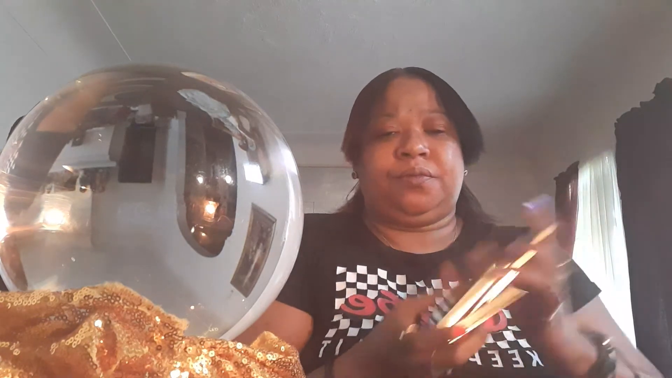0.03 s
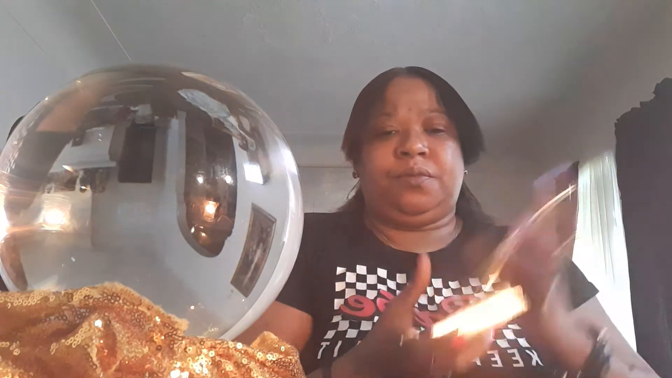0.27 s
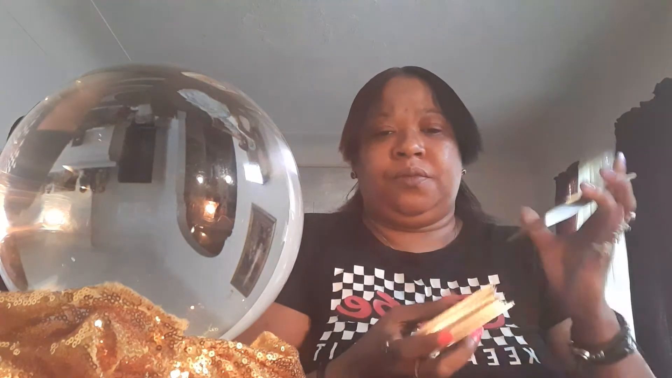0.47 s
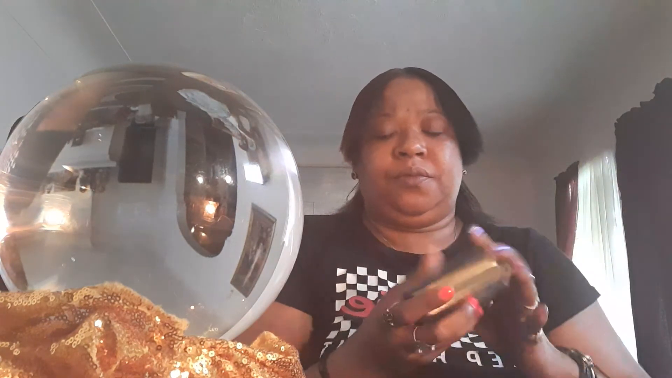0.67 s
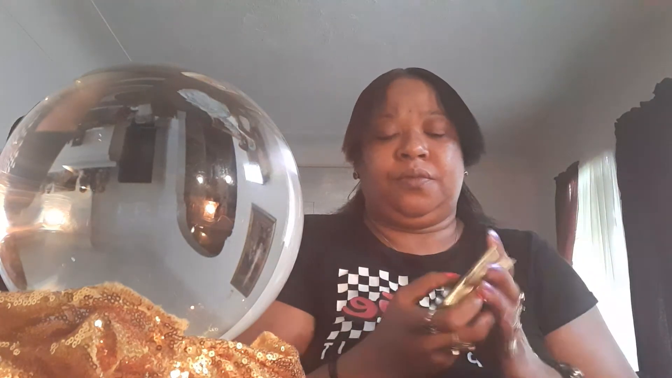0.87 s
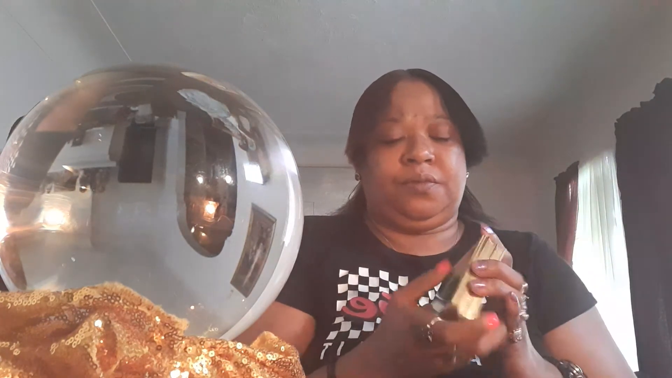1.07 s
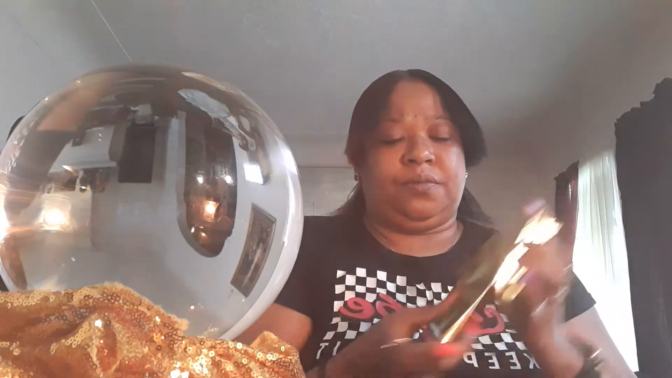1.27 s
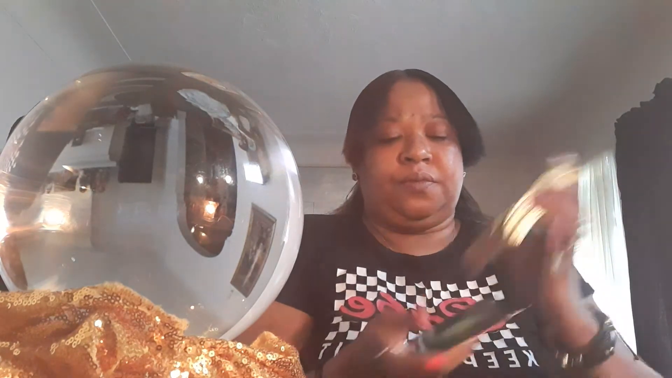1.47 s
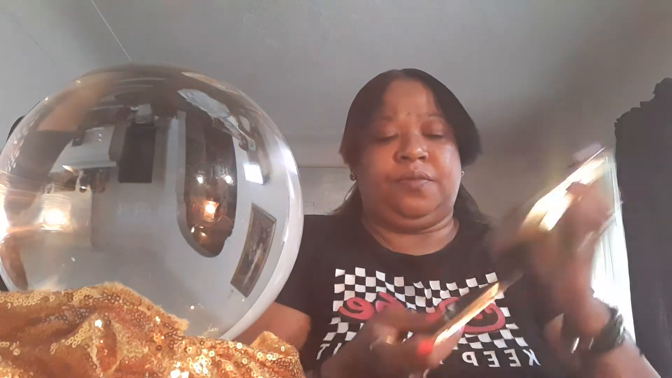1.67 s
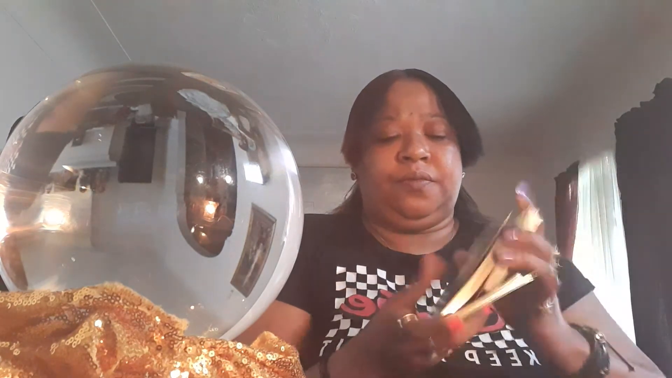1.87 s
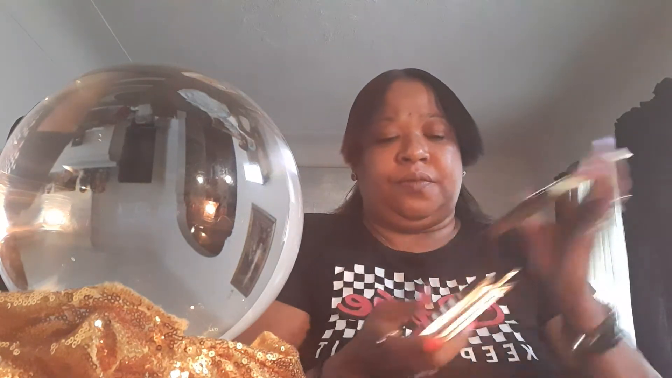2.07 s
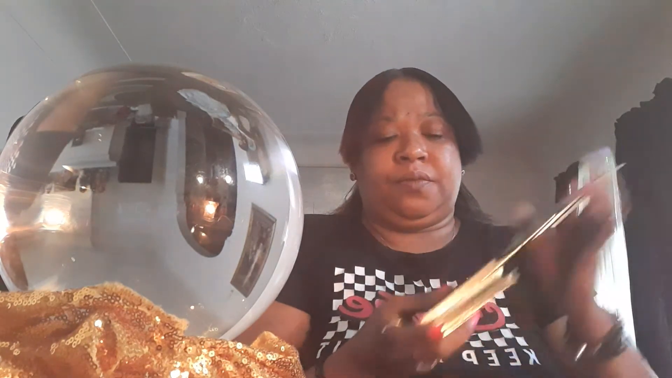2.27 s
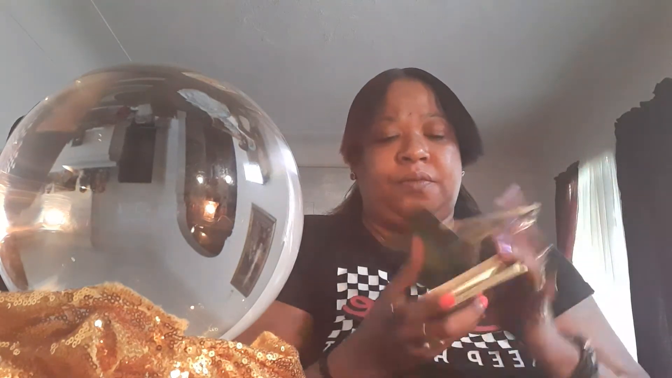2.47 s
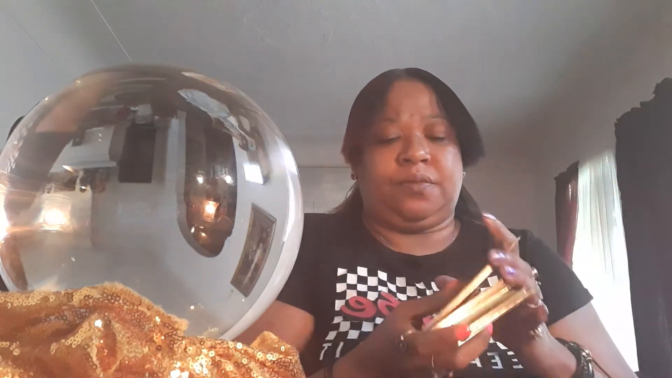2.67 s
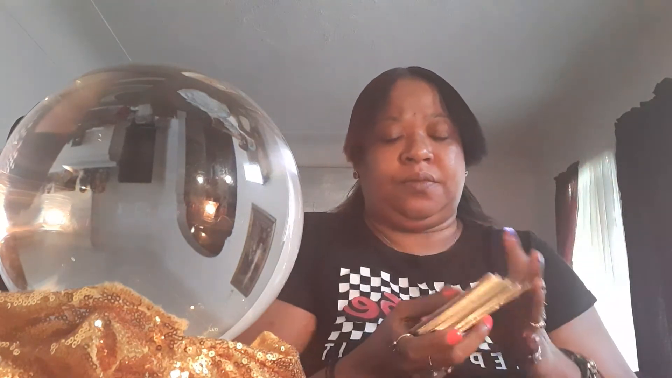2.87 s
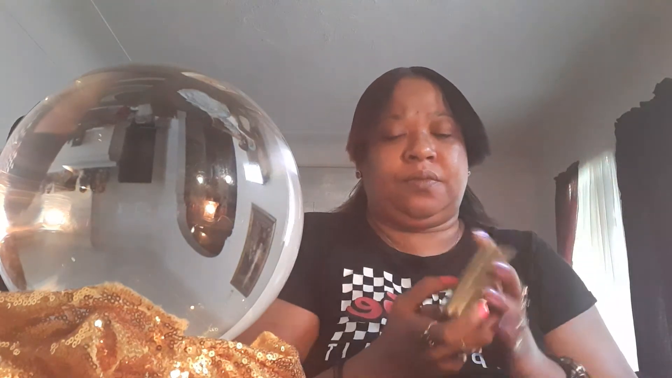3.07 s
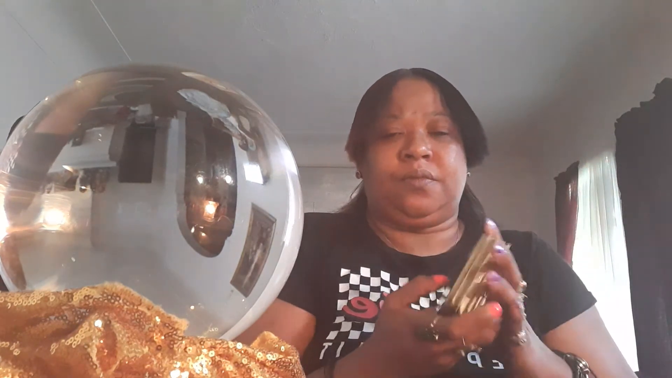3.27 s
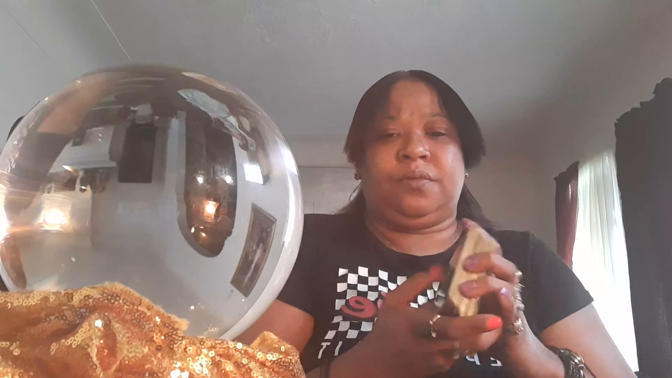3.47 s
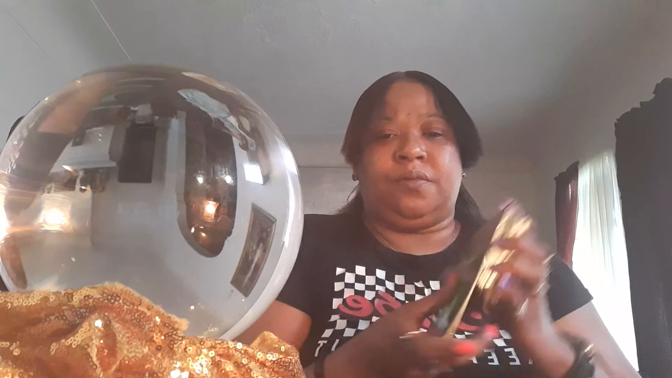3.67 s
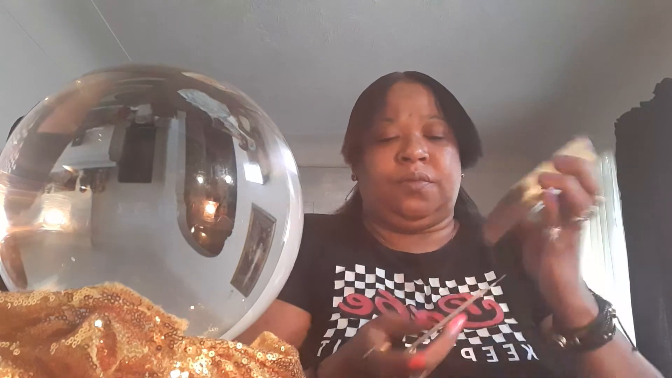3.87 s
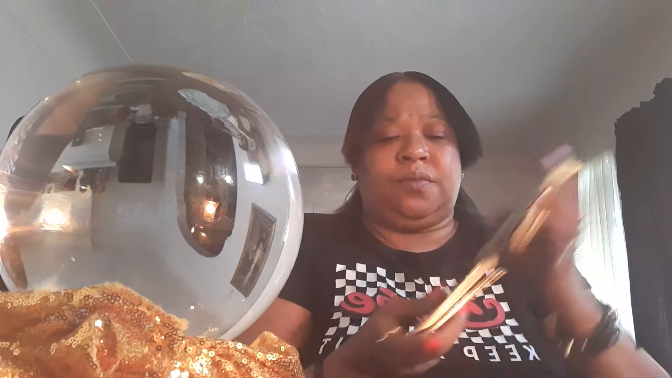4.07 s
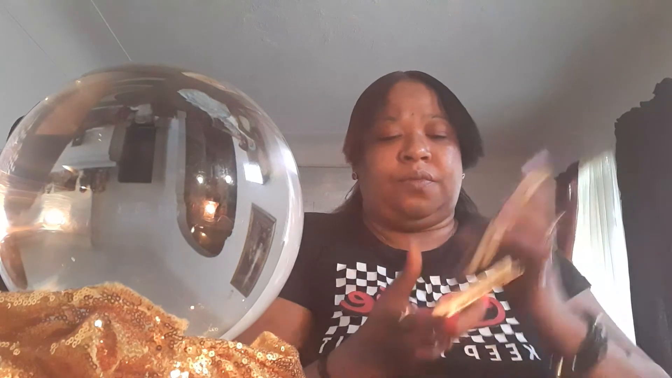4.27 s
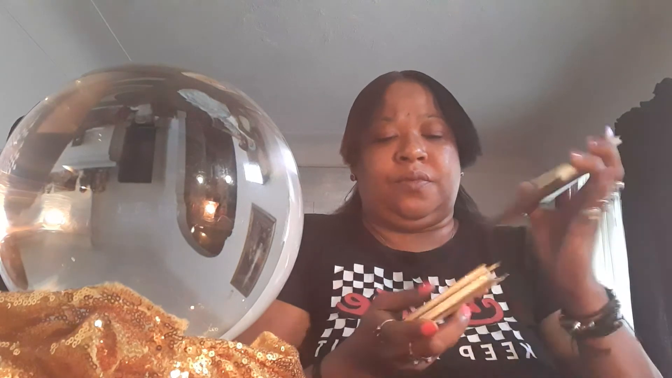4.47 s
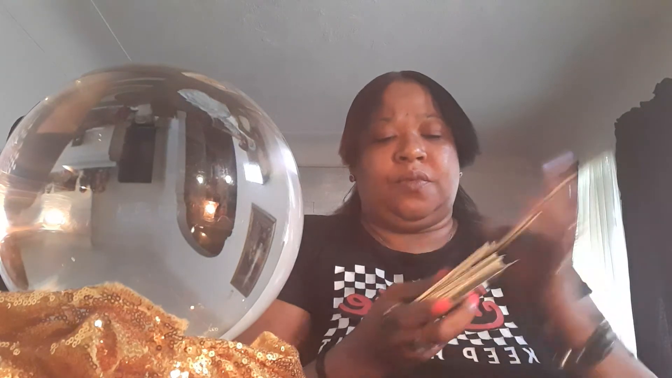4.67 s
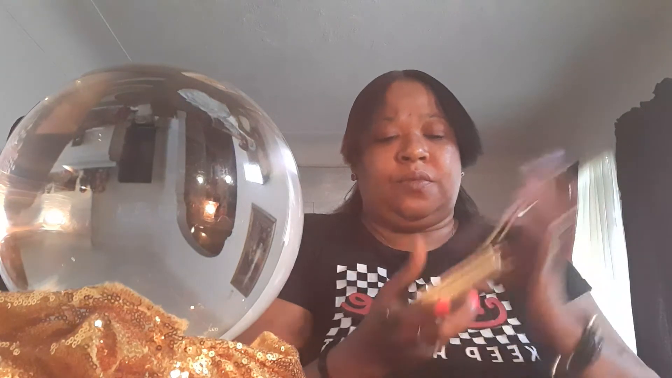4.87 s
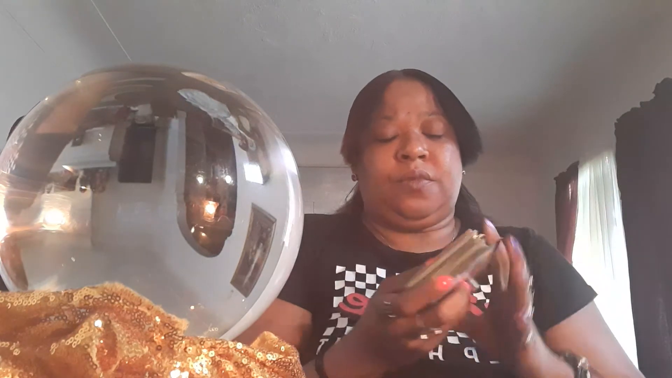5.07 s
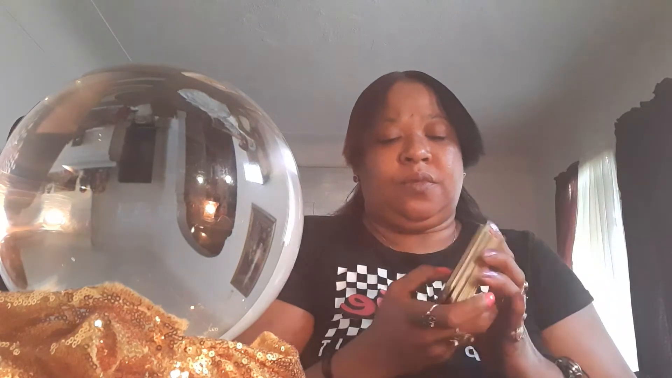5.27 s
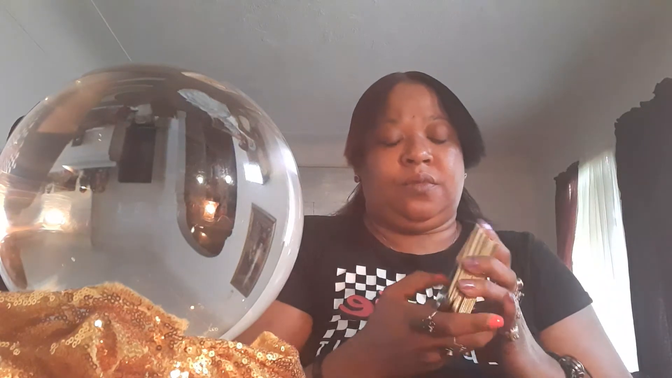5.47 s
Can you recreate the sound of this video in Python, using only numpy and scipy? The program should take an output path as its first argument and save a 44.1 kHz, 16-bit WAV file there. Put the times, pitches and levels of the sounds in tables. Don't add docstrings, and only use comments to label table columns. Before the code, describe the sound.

Stiff card packets smack onto a deck and scrape along its face, while fingers softly tap and square the cards. Moderate bursts open the scene, a very hard clack comes just before the middle, a soft pause follows, then quick strong slaps and fading handling. Heard about half a metre away through small built-in microphones, in a bare echoing room with steady hiss and distant rumble.

```python
import sys
import numpy as np
from scipy import signal
from scipy.fft import rfft, irfft
from scipy.io import wavfile
from scipy.ndimage import uniform_filter1d

SR = 44100
rng = np.random.default_rng(int(sys.argv[2]) if len(sys.argv) > 2 else 0)


def ratio_of_db(decibels):
    return 10 ** (np.asarray(decibels, float) / 20)


def master_out(mix):
    frames = np.transpose(np.atleast_2d(mix))
    ceiling = np.clip(frames, -1, 1)
    pcm = np.round(ceiling * 32767).astype(np.int16)
    wavfile.write(sys.argv[1], SR, pcm)


N = 243516

# pitch in Hz, width in Hz, level in dB.
ROOM_MODES = [(118.7, 7.1, -21.5), (202.3, 21, 0.5), (298.5, 53, -6), (381.2, 8.9, -10), (513.5, 12, -16),
              (541, 9.6, -20.5), (643.5, 6, -16.5)]


def table(rows, hz):
    rows = np.array(rows, float)
    return np.interp(np.log(np.maximum(hz, 1)), np.log(rows[:, 0]), rows[:, 1])


def curve(rows):
    s, value = np.transpose(rows)
    return np.interp(np.arange(N) / SR, s, value)


def band(x, lo_hz, hi_hz):
    edges_hz = [lo_hz, min(hi_hz, 0.45 * SR)]
    y = signal.sosfilt(signal.butter(2, edges_hz, "band", fs=SR, output="sos"), x)
    return y / np.sqrt(np.mean(y ** 2))


def ring(x, hz, width_hz):
    return signal.lfilter(*signal.iirpeak(hz, hz / width_hz, fs=SR), x)


def diffuse(size):
    # frequency in Hz, likeness at the two ports from 0 to 1.
    likeness = [(60, 1), (290, 0.51), (700, 1), (1400, 0.19), (4000, 0), (15000, 0)]
    like = np.clip(table(likeness, np.fft.rfftfreq(size, 1 / SR)), 0, 1)
    mid, side = rfft(rng.standard_normal((2, size)))
    mid = mid * np.sqrt((1 + like) / 2)
    side = side * np.sqrt((1 - like) / 2)
    return irfft(np.array([mid + side, mid - side]), size)


def walk(rate_hz):
    k = int(SR / rate_hz)
    steps = np.repeat(rng.standard_normal(N // k + 1), k)
    w = uniform_filter1d(steps, k)[:N]
    return w / w.std()


def swell(s, half_s, db):
    return ratio_of_db(db) * np.exp(-2 * ((np.arange(N) / SR - s) / half_s) ** 2)


def rumble():
    # time in seconds, level in dB.
    nearness = [(0, -43.5), (.3, -47), (.9, -46.5), (1.7, -39.5), (2.0, -45), (2.35, -44), (2.7, -64.5),
                (3.7, -56), (4.3, -52), (4.8, -47), (5.52, -44.5)]
    # start in seconds, level in dB.
    jolts = [
        (.06, -58),
        (.33, -43),
        (.68, -40.5),
        (2.47, -33.5),
        (4.039, -38),
        (4.91, -34.5),
    ]
    # middle in seconds, half length in seconds, level in dB.
    swells = [
        [(.49, 0.11, -45.5), (.705, 0.048, -31.5), (1.15, 0.23, -45), (1.45, 0.17, -41.5), (1.71, 0.099, -40),
         (2.3, 0.21, -54), (2.53, 0.082, -37), (3.81, .08, -56), (4.55, 0.11, -58), (4.9, 0.12, -67),
         (5.25, 0.35, -57.5)],
        [(.1, .12, -58), (.32, 0.091, -58), (.82, 0.13, -52), (1.12, 0.31, -43), (1.45, 0.31, -50),
         (1.97, 0.087, -47), (2.2, 0.075, -49), (2.47, 0.038, -32.5), (3.81, .1, -55.5), (4.32, 0.058, -46),
         (4.6, 0.19, -53), (4.92, 0.092, -59)],
    ]
    rest_levels = -69.5, -63
    low, t = diffuse(N), np.arange(N) / SR
    near = ratio_of_db(curve(nearness))
    shake = 0
    for s, db in jolts:
        fade_db = 132.5 * np.maximum(t - s, 0)
        rise = np.clip(1 + (t - s) / 0.01, 0, 1)
        shake = shake + ratio_of_db(db - fade_db) * rise
    sing = []
    for rows, rest_db in zip(swells, rest_levels):
        sing.append(ratio_of_db(rest_db) + sum(swell(*row) for row in rows))
    first_hz = ROOM_MODES[0][0] + 2.27 * walk(9)
    first = np.sin(2 * np.pi * np.cumsum(first_hz) / SR) * ratio_of_db(1.3 * walk(10))
    second = ring(low, ROOM_MODES[1][0], 2.56)
    third = ring(diffuse(N), ROOM_MODES[2][0], 24.0)
    broad = ratio_of_db(-6.0) * (near + shake) * band(low, 72, 290)
    broad = broad + ratio_of_db(-15) * near * band(low, 330, 1100)
    notes = sing[0] * first + ratio_of_db(-5.0) * sing[1] * second / second.std()
    return broad + notes + ratio_of_db(-66) * third / third.std()


def air():
    # frequency in Hz, level in dB per Hz.
    hiss_colour = [(18, -48), (30, -15), (109, 5), (204, -12.5), (259, -10), (937, -10), (1350, -23),
                   (2230, -22), (3670, -30), (4650, -26), (7670, -32.5), (12300, -29.5), (16000, -26.5)]
    hiss = irfft(rfft(diffuse(N)) * ratio_of_db(table(hiss_colour, np.fft.rfftfreq(N, 1 / SR))), N)
    return ratio_of_db(-56 + 0.71 * walk(0.72)) * hiss / hiss.std()


def thumb():
    # time in seconds, level in dB.
    strength = [(0, -74.5), (3.2, -83), (3.4, -73.5), (3.8, -76.5), (3.87, -57), (3.97, -63), (4.0, -81),
                (5.3, -73), (5.52, -80)]
    return ratio_of_db(curve(strength) + 1.5 * walk(35)) * band(diffuse(N), 4200, 4520)


def slide():
    # start in seconds, level in dB, hold in seconds, fade in dB per second, hiss in dB.
    strokes = [(.01, -46, .01, 400, -12), (0.021, -38, 0.023, 120, -2), (0.325, -37, .01, 300, -1.5),
               (0.413, -44, 0.011, 144, -2), (0.615, -43.5, 0.022, 400, 0), (0.648, -51.5, 0.025, 142, 10),
               (1.347, -39.5, 0.008, 230, -22), (1.56, -36, .025, 300, -3), (1.584, -36.5, 0.055, 398, -4),
               (1.636, -39.5, 0.0052, 257, 0), (1.866, -50.5, 0.017, 400, -2),
               (1.887, -40.5, 0.039, 166.5, -1.5), (2.176, -35, 0.023, 213.5, 0),
               (2.429, -20.5, 0.0067, 404.5, -3), (2.46, -24.5, 0.052, 136, -6.5),
               (3.02, -60.5, .005, 404.5, -8), (3.768, -39, 0.0079, 220, -10), (3.993, -34, .07, 223, 0.5),
               (4.299, -29, 0.018, 400, -2.5), (4.321, -29, 0.011, 330, -3.5),
               (4.415, -44.5, 0.05, 243, -0.5), (4.596, -30.5, 0.017, 152, 2), (4.893, -30, 0.036, 210, -2),
               (5.216, -56, 0.0079, 157, 2)]
    # middle in seconds, level in dB, half length in seconds, hiss in dB.
    brushes = [(0.126, -49.5, 0.023, 8.5), (0.359, -38.5, 0.035, 3), (0.228, -59, 0.019, 4),
               (0.616, -61, 0.032, -2), (0.894, -56, 0.11, -5), (1.012, -53, 0.025, 3),
               (1.34, -57.5, 0.11, 8), (1.53, -59, .08, -8), (1.84, -60, 0.3, -15), (1.983, -55, 0.019, 13),
               (2.323, -52.5, 0.15, 0.5), (2.808, -53, .08, -3.5), (3.104, -57, 0.071, 1.5),
               (3.457, -68, .3, -4), (3.77, -46, .03, 7), (3.913, -56, 0.094, -18),
               (5.199, -52.5, 0.068, -6), (5.46, -63.5, 0.18, -0.5)]
    stroke_body_db, brush_body_db = -6.5, -3
    t, speed = np.arange(N) / SR, np.zeros((3, N))
    for s, db, hold, fade_db, hiss_db in strokes:
        since = np.maximum(t - s, 0)
        bite_db = 7.5 * np.exp(-since / 0.0053)
        sag_db = 31.5 * since
        fall_db = bite_db - sag_db - fade_db * np.maximum(since - hold, 0)
        pick_up = np.clip(0.51 + since / 0.013, 0, 1)
        shape = (t >= s) * ratio_of_db(db + fall_db) * pick_up
        speed += np.outer(ratio_of_db(np.array([0, stroke_body_db, hiss_db])), shape)
    for s, db, half_s, hiss_db in brushes:
        speed += np.outer(ratio_of_db(np.array([0, brush_body_db, hiss_db])), swell(s, half_s, db))
    catch = (rng.random(N) < 900 / SR) * rng.standard_normal(N)
    rub = rng.standard_normal(N) + 3 * catch + 2.2 * diffuse(N)
    grit = ratio_of_db(2.2 * walk(90)) * rub
    face, body, hiss = speed
    body_sound = 0.82 * band(grit, 442, 950) + 0.35 * band(grit, 560, 720)
    sound = face * band(grit, 1300, 5070) - body * body_sound - hiss * band(grit, 6570, 15600)
    return ratio_of_db(-4.0) * sound


def slaps():
    # time in seconds, peak in dB, ring in Hz, thud in dB.
    flat = [(.0238, -18.5, 2140, -2), (.6313, -33.5, 2320, 2.5), (.6522, -22.5, 1540, 9),
            (.666, -30.5, 3400, -2), (1.562, -41, 2560, 14), (1.584, -19.5, 1470, -4.5),
            (1.6405, -20, 1460, -10), (1.8852, -31.5, 1410, 0.5), (1.9114, -28, 3550, -3),
            (1.9949, -30.5, 2320, -3.5), (2.172, -27, 1400, -1), (2.4541, -5, 1530, -0.5),
            (2.459, -14, 1420, -2), (2.5, -9.5, 1400, -20), (3.7717, -25.5, 4050, -3.5),
            (3.9954, -18, 2720, -13), (4.0055, -23.5, 1430, 3), (4.0856, -27, 1810, -4),
            (4.096, -36, 2200, -1), (4.3188, -13.5, 4100, -12.5), (4.4099, -27, 2900, .5),
            (4.597, -10.5, 1780, -9), (4.599, -14.5, 1140, -9), (4.8953, -16.5, 2180, -4.5),
            (4.9079, -19.5, 2460, -7.5)]
    edgewise = [(0.3217, -17, 2210, -7.5), (0.3527, -24, 4150, -19), (0.416, -23, 2320, 5),
                (1.353, -23.5, 4460, -3), (2.1942, -26.5, 3150, -18), (2.2386, -27.5, 2440, -18),
                (2.4309, -6, 1510, -10.5), (4.004, -22.5, 2870, -3), (4.2994, -22.5, 4250, -5),
                (4.332, -22, 4310, -35)]
    taps = [(1.3623, -31, 2970, -0.5), (0.124, -36, 4470, -27), (0.2162, -42, 1540, -19),
            (0.303, -47.5, 2920, -25), (.62, -37, 2200, 4), (0.8347, -45, 4700, -1),
            (1.0041, -46.5, 4800, 2), (1.1975, -47.5, 2750, 3), (1.245, -52, 1320, 3),
            (1.2835, -64, 2700, -6), (2.335, -45.5, 1100, 10), (2.3427, -39, 3230, -6),
            (3.0257, -42.5, 1500, -0.5), (3.0686, -59, 1233, -4), (3.3002, -49.5, 1260, -7.5),
            (3.3965, -52.5, 4770, -1.5), (3.5919, -50.5, 6000, -10), (3.984, -36, 2470, -8),
            (4.4732, -36.5, 3030, -14), (4.577, -41, 7500, -22), (5.1555, -48, 2400, -2),
            (5.182, -46, 1460, -13), (5.221, -34, 4270, -8), (5.4579, -54, 4340, 9)]
    # thud in Hz, edge tick in dB.
    contact = [
        (640, -14.5),
        (920, -7.5),
        (415, -4),
    ]
    blows = []
    for rows, kind in zip((flat, edgewise, taps), contact):
        blows += [(*row, *kind) for row in rows]
    size = 2048
    out, t = np.zeros(N + size), np.arange(size) / SR
    noise = rng.standard_normal((len(blows), 3, size))
    noise[:, :, 30] = 6., 7., 4.
    for (s, db, hz, thud_db, thud_hz, edge_db), chatter in zip(blows, noise):
        contact_s = 0.0018 * np.sqrt(2500 / hz)
        a, b, c = chatter * np.minimum(t / 0.001, 1) * np.exp(-t / contact_s)
        flex = 0.62 * band(a, hz / 2.0, hz * 2.19) + 0.98 * band(a, hz / 1.32, hz * 1.187)
        thud = band(b, thud_hz / 1.4, thud_hz * 1.85)
        edge = band(c, 5500, 17000)
        flex, thud, edge = (p / np.abs(p).max() for p in (flex, thud, edge))
        i = max(int(s * SR) - 15, 0)
        out[i:i + size] += ratio_of_db(db + 4.0) * (flex + ratio_of_db(thud_db) * thud + ratio_of_db(edge_db) * edge)
    return out[:N]


def table_thump():
    # time in seconds, level in dB.
    thumps = [
        (0.653, -27),
        (0.667, -58),
        (2.456, -32),
        (4.601, -61),
    ]
    # pitch in Hz, level in dB, seconds to fade by 60 dB.
    table_notes = [(121.6, 1, 0.18), (217, -9.5, 0.14), (304, -6.5, 0.061), (369, 3, 0.16),
                   (458.4, -2, 0.084)]
    out = 0
    for s, db in thumps:
        t = np.maximum(np.arange(N) / SR - s, 0)
        hum = 0
        for hz, note_db, t60 in table_notes:
            hum = hum + ratio_of_db(note_db) * 1000 ** (-t / t60) * np.sin(2 * np.pi * hz * t)
        out = out + ratio_of_db(db) * np.minimum(t / 0.0077, 1) * hum
    return out


def room(x):
    # delay in ms, level in dB.
    echoes = [(6.5, -18), (8.8, -18), (12.4, -20), (17.5, -25.5), (23, -20)]
    # frequency in Hz, seconds to fade by 60 dB.
    fade_times = [(100, 0.55), (500, 0.46), (3000, 0.36), (14000, 0.24)]
    size = SR // 2
    t, tail = np.arange(size) / SR, 0
    for hz in 90 * 2. ** np.arange(8):
        fade = 1000 ** (-t / table(fade_times, hz))
        tail = tail + band(diffuse(size), hz / 1.42, hz * 1.275) * (hz / 8000) ** 0.78 * fade
    tail = tail + sum(ratio_of_db(db + 21) * ring(tail, hz, width) for hz, width, db in ROOM_MODES)
    response = ratio_of_db(-37.0) * tail * np.clip((t - 0.005) / 0.0063, 0, 1)
    response[:, 0] += 1
    for (ms, db), skew in zip(echoes, rng.uniform(-19, 7.3, len(echoes))):
        delay = ms * SR / 1000
        response[[0, 1], [int(delay + skew), int(delay - skew)]] += ratio_of_db(db + 5.0)
    return signal.fftconvolve(x, response, axes=1)[:, :N]


def scene():
    return room(slaps() + slide()) + thumb() + table_thump() + rumble() + air()


def top_cut(x):
    return signal.sosfilt(signal.butter(12, 17080, fs=SR, output="sos"), x)


def record(dry):
    # frequency in Hz, level in dB.
    mic_colour = [(25, -19), (55, -2), (300, -2), (700, -2.5), (1250, -3), (1600, -1), (2400, -1.5),
                  (3400, -2.5), (4500, 1.5), (5600, -2.5), (9000, -3.5), (13000, -1.5), (15700, -0.5),
                  (17100, -45)]
    hz = np.fft.rfftfreq(N, 1 / SR)
    cavity = 1 - (hz / 1400) ** 2 + 1j * hz / 3100
    turn = np.conj(cavity) / cavity
    left = ratio_of_db(2.0 - 5.2 * np.sqrt(hz / 12000)) + 0j
    right = ratio_of_db(-0.21) * turn
    heard = irfft(rfft(dry) * ratio_of_db(table(mic_colour, hz)) * np.array([left, right]), N)
    return top_cut(np.clip(heard, -0.98, 0.98))


dry = scene()
out = record(dry)
master_out(out)
```